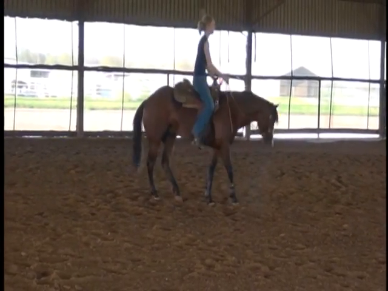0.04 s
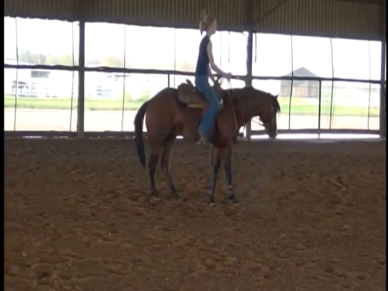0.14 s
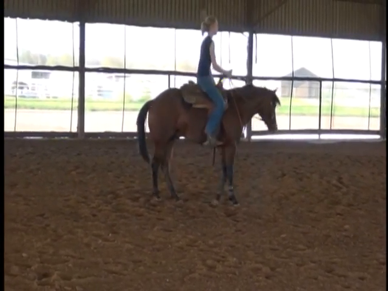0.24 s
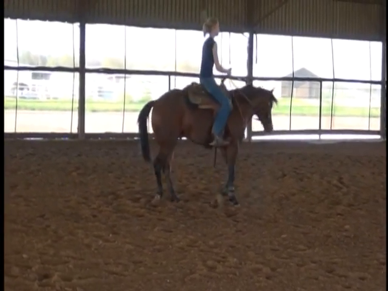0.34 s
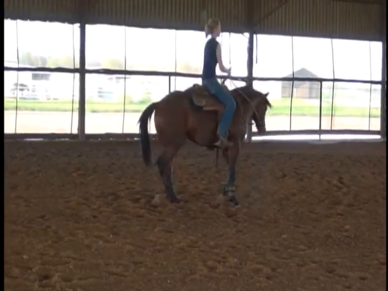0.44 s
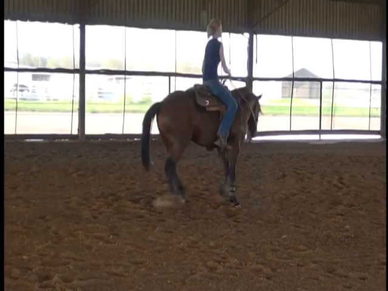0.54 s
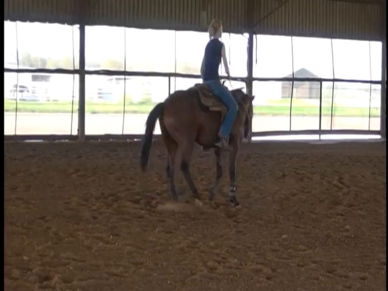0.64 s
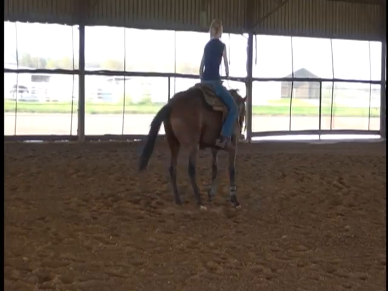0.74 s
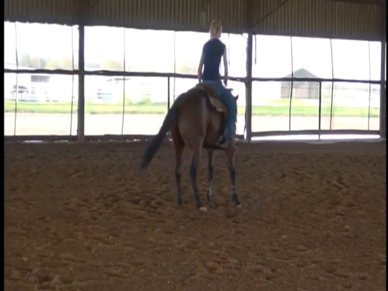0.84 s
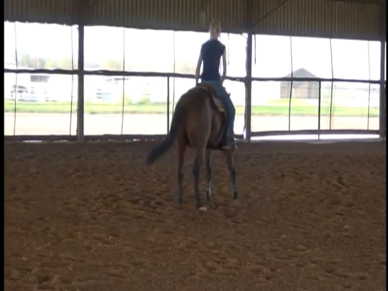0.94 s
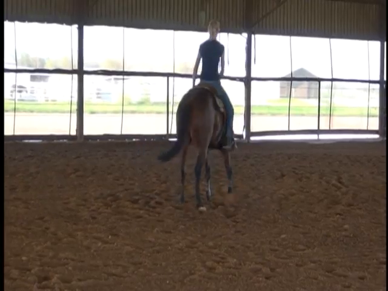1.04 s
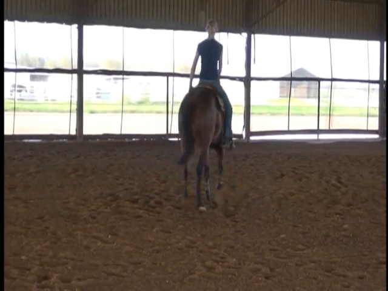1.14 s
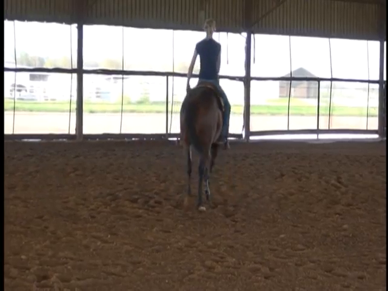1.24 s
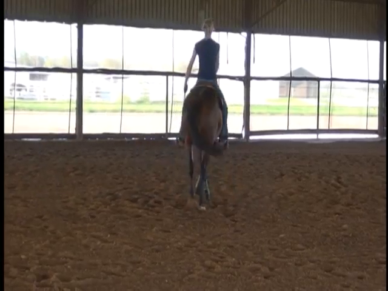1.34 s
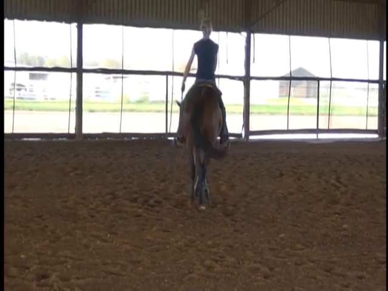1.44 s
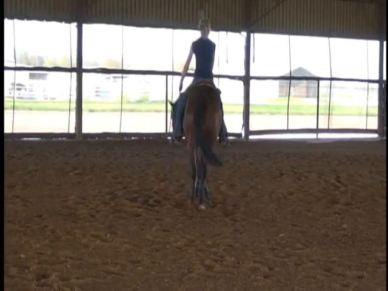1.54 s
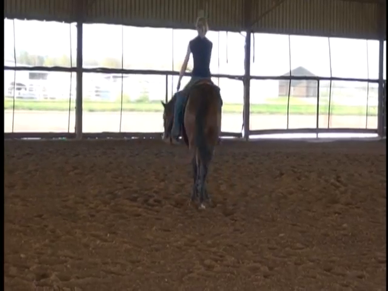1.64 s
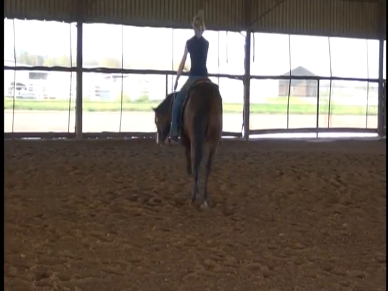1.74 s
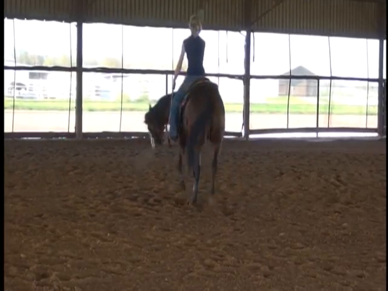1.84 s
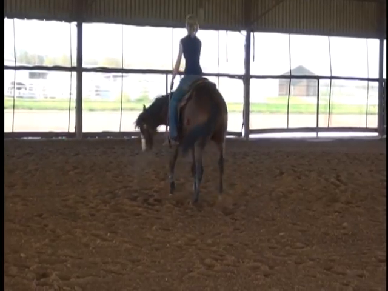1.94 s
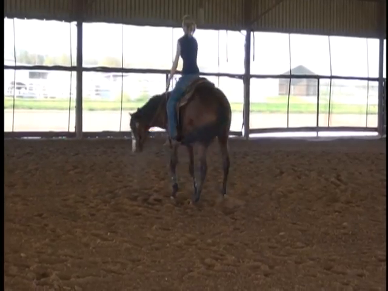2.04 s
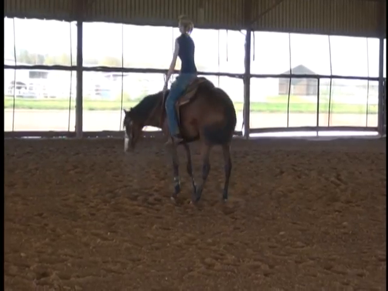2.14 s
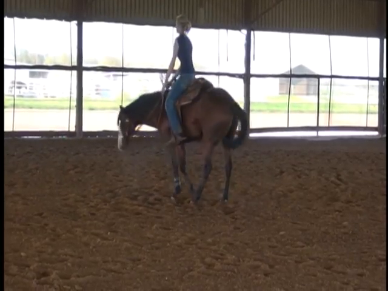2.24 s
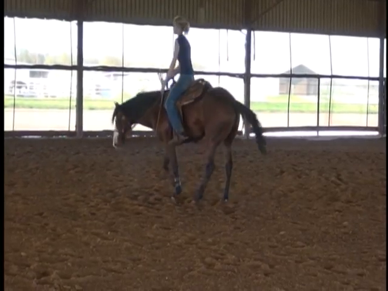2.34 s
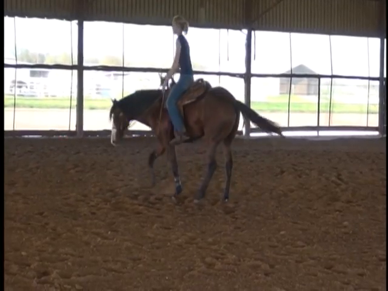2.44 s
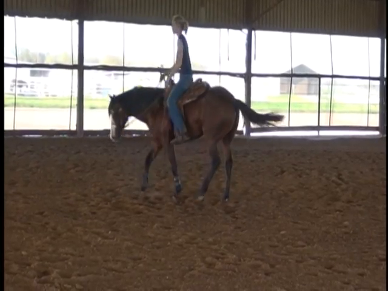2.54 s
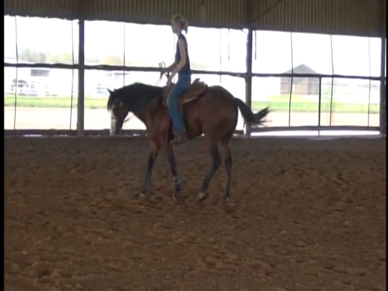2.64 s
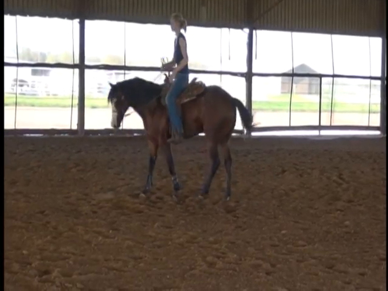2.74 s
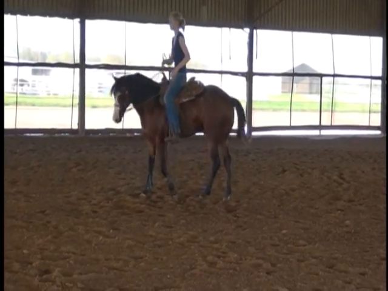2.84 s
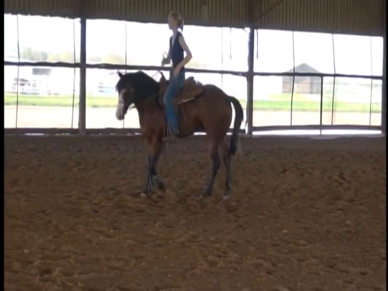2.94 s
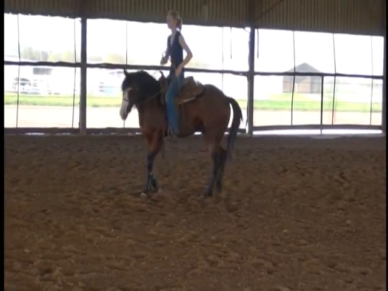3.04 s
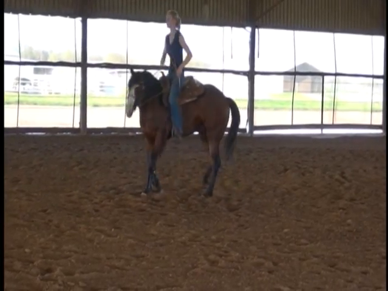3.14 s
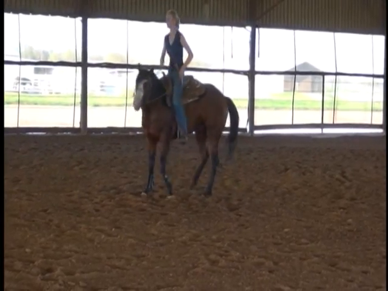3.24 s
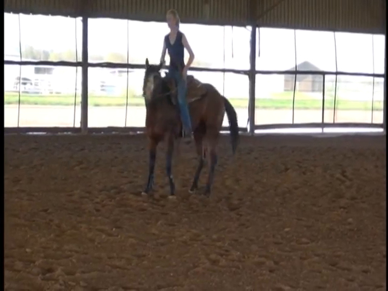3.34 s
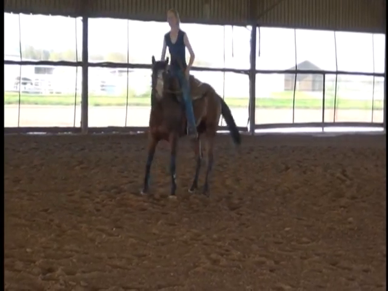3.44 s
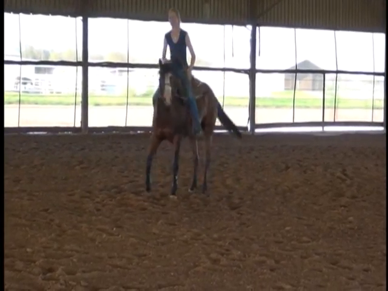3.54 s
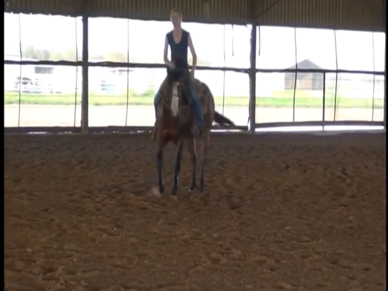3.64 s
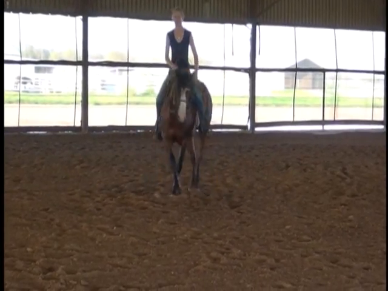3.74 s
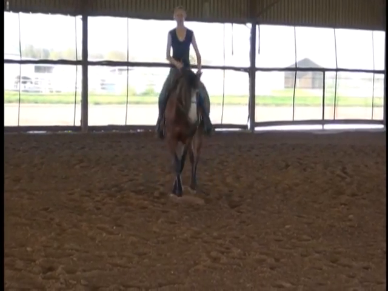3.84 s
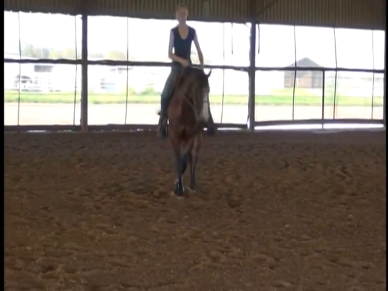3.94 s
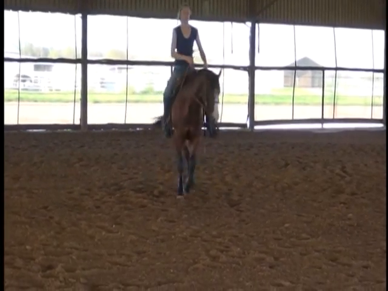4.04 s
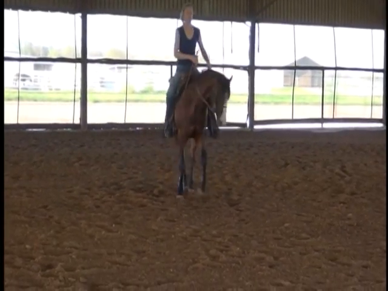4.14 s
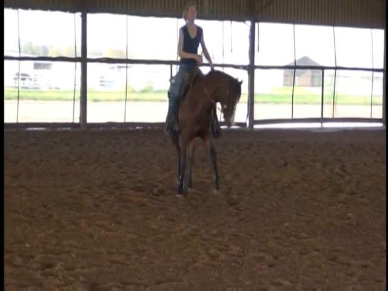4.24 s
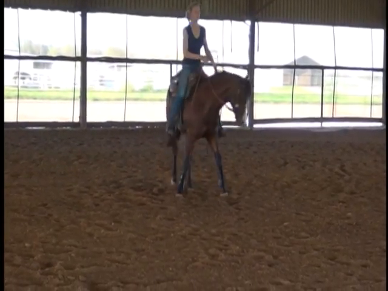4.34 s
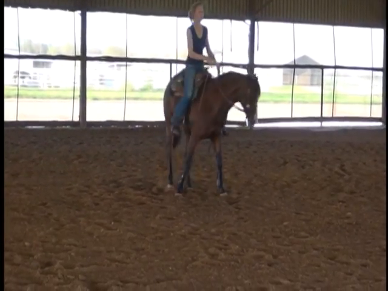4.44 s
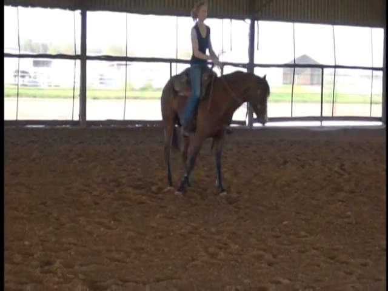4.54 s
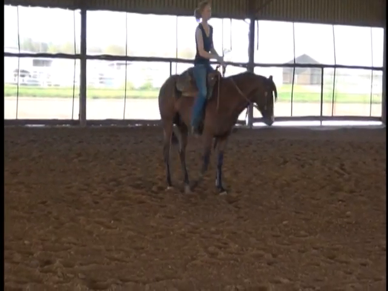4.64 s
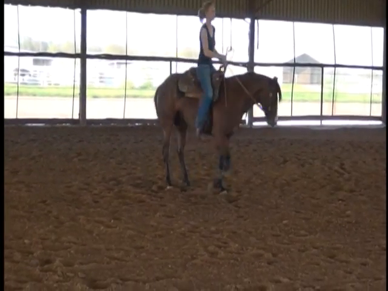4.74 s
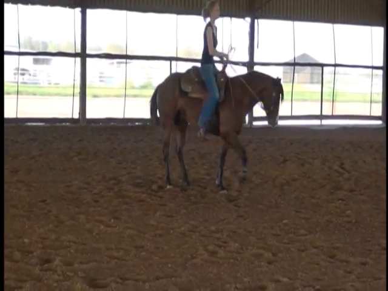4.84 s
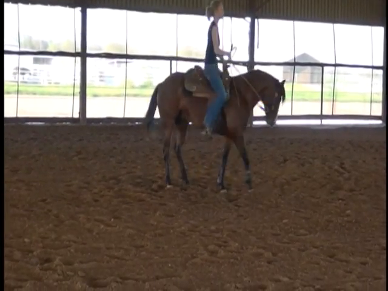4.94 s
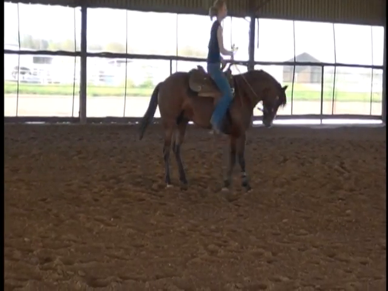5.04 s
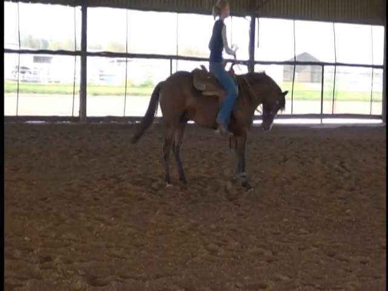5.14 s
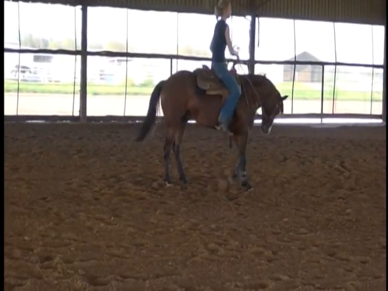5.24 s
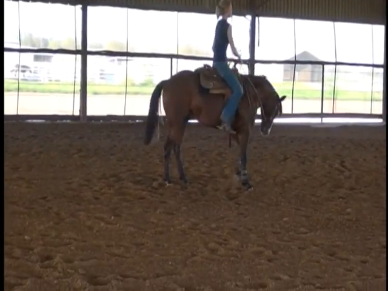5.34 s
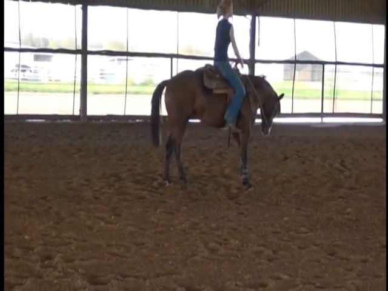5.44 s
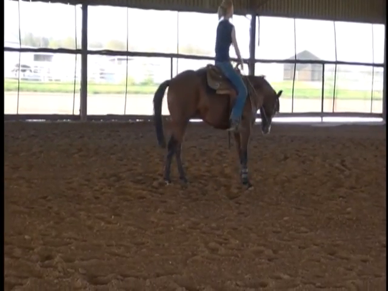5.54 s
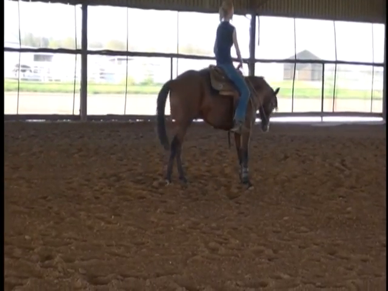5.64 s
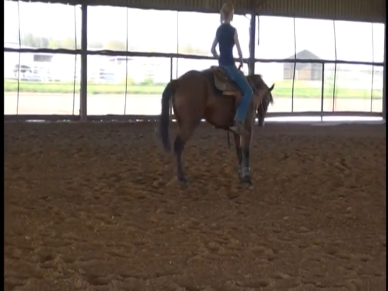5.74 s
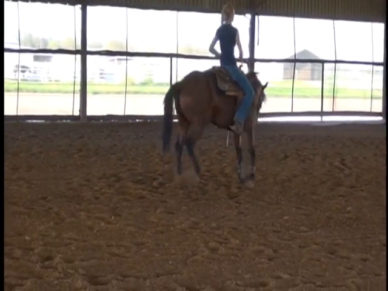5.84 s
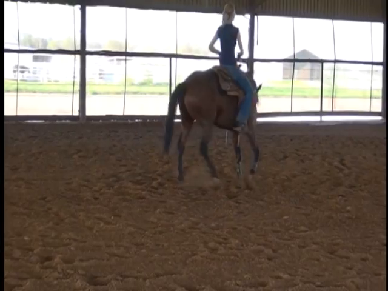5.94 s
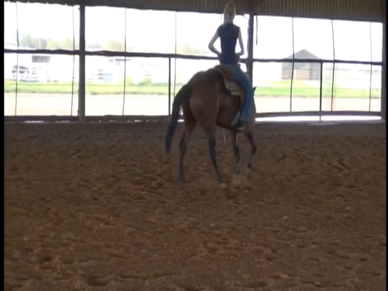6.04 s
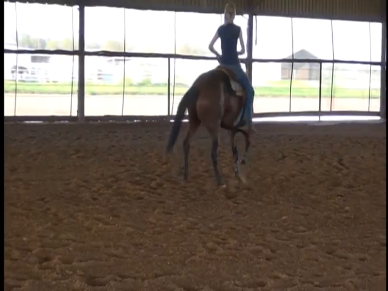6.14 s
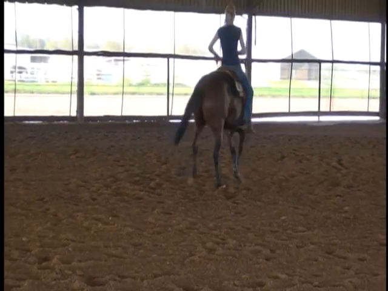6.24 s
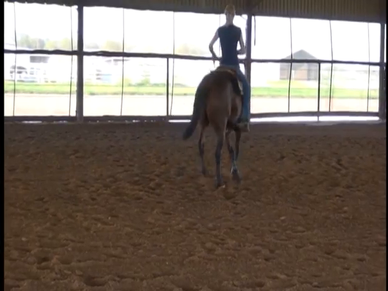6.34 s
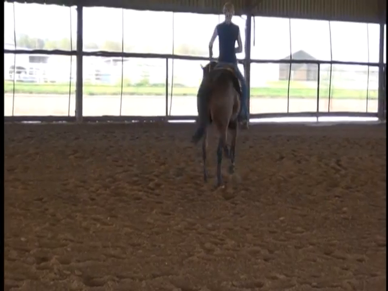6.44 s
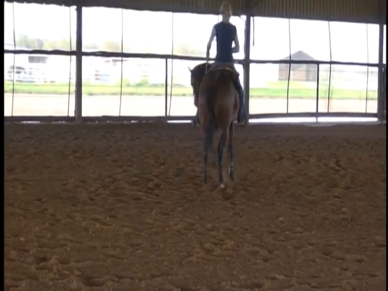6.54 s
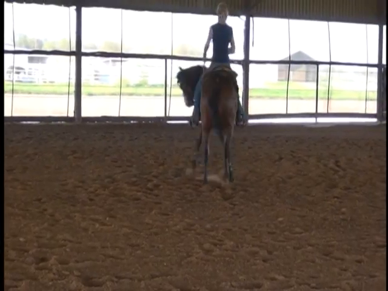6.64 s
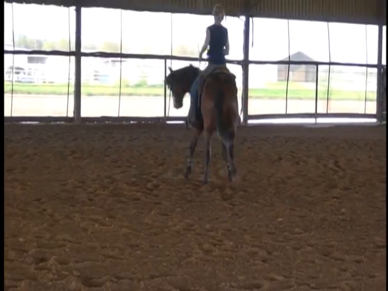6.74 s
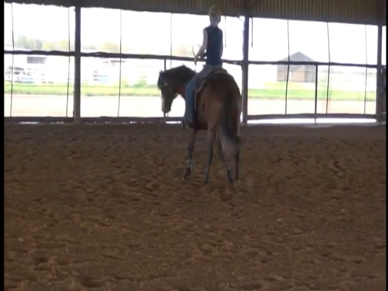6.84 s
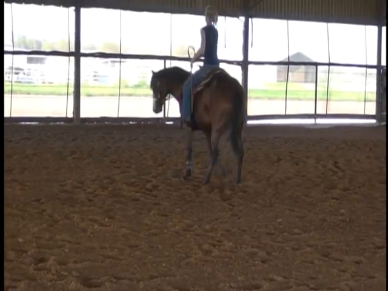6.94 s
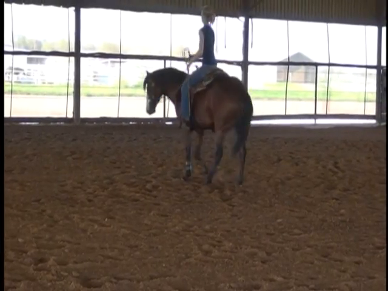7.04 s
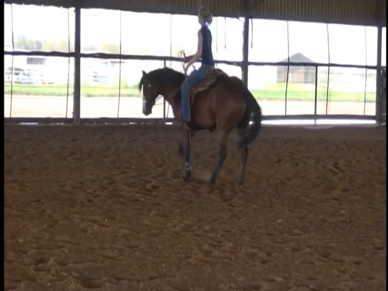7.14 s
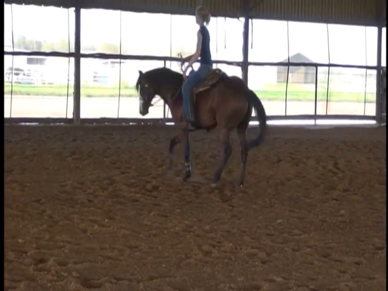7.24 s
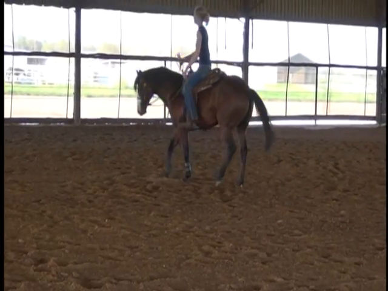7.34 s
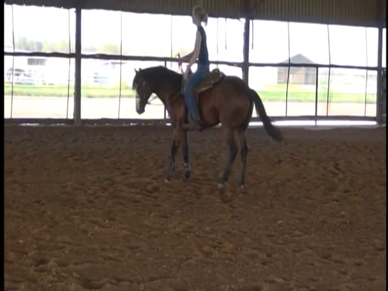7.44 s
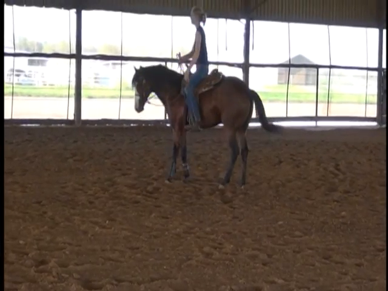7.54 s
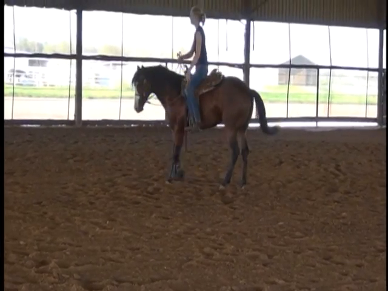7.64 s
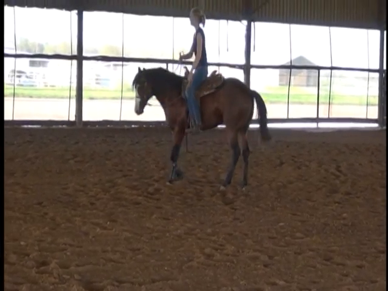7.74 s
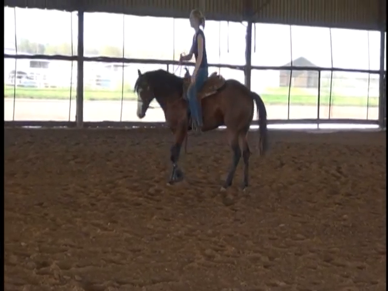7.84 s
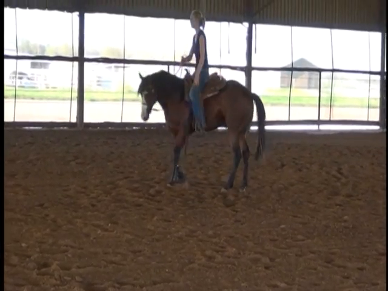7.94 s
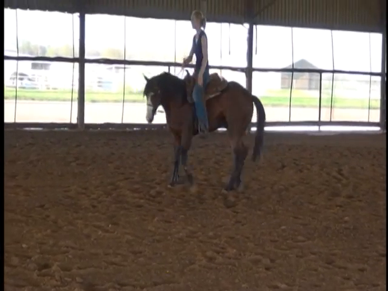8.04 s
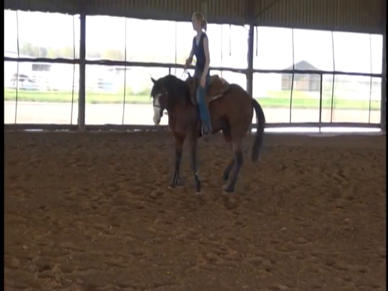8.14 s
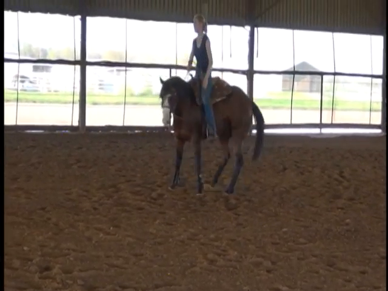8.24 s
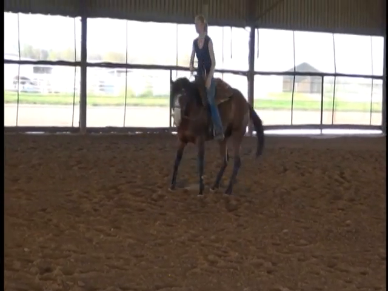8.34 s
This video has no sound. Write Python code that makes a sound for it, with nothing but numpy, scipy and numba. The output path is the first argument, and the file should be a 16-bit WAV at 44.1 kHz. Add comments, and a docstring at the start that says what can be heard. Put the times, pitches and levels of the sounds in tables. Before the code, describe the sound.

The faint tail of an earlier snort decays over the first second in a roofed, open-sided arena. Dull hoof thuds in soft dirt come near 0.2, 0.3 and 1.5 s, with small bright clicks of bit and spurs and bird chirps around 0.7 and 1.1 s. At about 1.75 s the horse snorts: a strong, damp, nasal burst, rapidly fluttering and slowing as the nostrils slacken, with wet pops and breathy hiss, ending near 2.4 s in a short hall echo. Then it is quiet: very soft, regular steps, a barely audible tail brush at 3.4 s, chirps near 2.7 and 3.5 s, a cluster of tack clinks around 4.1-4.4 s and a sharper click at 5.85 s. Gliding bird whistles crowd 5.1-6.7 s, with a low hooting pair near 6.2 s; chirps and light clinks continue to about 8.1 s. Distant traffic slowly recedes beneath steady hiss and faint hum.

```python
"""A horse snorts in a metal-roofed, open-sided arena: damp air rushes through the nose in puffs, chopped by
flapping nostrils, and excites resonances, slaps, wet pops and a jet of hiss. Around it hooves thud on soft
dirt as filtered noise, the tail brushes once, and steel bit and spurs click and ring as decaying modes.
Outside, small birds sing as gliding sines over a noise wash of distant traffic, with hiss and electrical hum.
The tail of an earlier blast dies away at the start; delays and decaying noise responses form the echoes."""
import sys
import numpy as np
from scipy import signal
from scipy.fft import rfft, irfft, next_fast_len
from scipy.io import wavfile
from scipy.ndimage import uniform_filter1d
from numba import njit

SR = 44100
rng = np.random.default_rng(int(sys.argv[2]) if len(sys.argv) > 2 else 0)


def materialize(psi):
    """Save the field psi as 16-bit PCM at rate SR to the path in sys.argv[1].

    A 1-D psi becomes a single channel; in a 2-D psi each row is a channel.
    """
    bounded = np.clip(np.atleast_2d(psi).T, -1, 1)
    quanta = np.round(bounded * 32767).astype(np.int16)
    wavfile.write(sys.argv[1], SR, quanta)


N = 369558
T = np.arange(N) / SR

# the snort is one push of air: its start, then the times to open, stay open and close (s)
SNORT_S, ATTACK_S, HOLD_S, RELEASE_S = 1.738, 0.08, 0.4, 0.17


def undb(db):
    """Level and amplitude: 20 dB is a factor of ten in gain."""
    return 10 ** (np.asarray(db) / 20)


def unit(x):
    """Normalization: scale the root-mean-square amplitude to 1."""
    return x / np.sqrt(np.mean(x ** 2))


def lookup(hz, points):
    """Logarithmic frequency scale: interpolate (Hz, value) points along it."""
    f, value = np.transpose(points)
    return np.interp(np.log(hz + 1), np.log(f), value)


def colour(x, points):
    """Linear filtering: weight the spectrum by a curve of (Hz, dB) points."""
    n = next_fast_len(len(x))
    gain = undb(lookup(np.fft.rfftfreq(n, 1 / SR), points))
    return irfft(rfft(x, n) * gain, n)[:len(x)]


def butter(x, order, hz, kind="low"):
    """Maximally flat filtering: pass a band without ripple."""
    return signal.sosfilt(signal.butter(order, hz, kind, fs=SR, output="sos"), x)


@njit
def band(x, hz, width):
    """Driven resonance: a second-order system whose centre may move; gain 1 at the centre."""
    y, b, l = np.empty(len(x)), 0., 0.
    for i in range(len(x)):
        g, k = np.pi * hz[i] / SR, width / hz[i]
        v = (b + g * (x[i] - l)) / (1 + g * (g + k))
        b, l, y[i] = 2 * v - b, l + 2 * g * v, k * v
    return y


def resonate(x, modes, sag=0., sag_above_hz=1750):
    """Modal superposition: sum (Hz, width Hz, dB) resonances; the upper ones sink by the share `sag`."""
    total = 0
    for k, (hz, width, db) in enumerate(modes):
        centre = hz * (np.ones(N) - sag * (hz > sag_above_hz))
        total = total + (-1) ** k * undb(db) * band(x, centre, 1. * width)
    return total


def ring(modes, t):
    """Free vibration: (Hz, dB, t60 s) modes decay exponentially, each slightly detuned at random."""
    total = 0
    for hz, db, t60 in modes:
        detuned_hz = hz * (1 + 0.00074 * rng.standard_normal())
        total = total + undb(db) * np.sin(2 * np.pi * detuned_hz * t) * np.exp(-np.log(1000) * t / t60)
    return total


def walk(rate):
    """Random modulation: low-passed noise with a spread near 1."""
    k = int(SR / rate)
    held = np.repeat(rng.standard_normal(N // k + 1), k)
    return 1.08 * uniform_filter1d(uniform_filter1d(held, k), k)[:N]


def swell(peak_s, width_s):
    """Gaussian envelope: a smooth rise and fall about a moment, 1 at the top."""
    return np.exp(-((T - peak_s) / width_s) ** 2)


def add(track, s, sound):
    """Superposition: mix a sound in at a time."""
    i = max(int(s * SR), 0)
    track[i:i + len(sound)] += sound[:N - i]


def spread(mid, side, side_db):
    """Spatial coherence: left and right share the middle; the side is weak at long wavelengths."""
    side_shape = [(120, -60), (250, -24), (500, -8), (1200, 0.5), (4000, 4.0), (9000, 5.0), (13000, 0.0)]
    return mid + undb(side_db) * colour(side, side_shape) * np.array([[1], [-1]])


def arena(x, wet_db, early_db, early_s=0.024, side_db=-15):
    """Reverberation: direct sound, quick scatter from ground and roof, and a tail whose treble dies first."""
    # Each row: frequency in Hz, reverberation time t60 in seconds.
    hall_t60 = [(150, 1.24), (1000, 0.91), (3000, 0.78), (6300, 0.76), (9000, 0.19), (14000, 0.14)]
    t = T[:int(1.5 * SR)]
    hz, s, cells = signal.stft(rng.standard_normal((2, len(t))), SR)
    decay = undb(-60 * s / lookup(hz, hall_t60)[:, None])
    tail = signal.istft(cells * decay, SR)[1][:, :len(t)]
    tail = tail * np.minimum(t / 0.057, 1)  # the tail builds up over 57 ms
    early = rng.standard_normal((2, len(t))) * np.exp(-t / early_s) * (t > .004)
    response = (undb(wet_db) * unit(tail) + undb(early_db) * unit(early)) / np.sqrt(len(t))
    mid, side = (signal.fftconvolve(x, r)[:N] for r in response)
    return spread(x + mid, side, side_db)


def traffic(start_db=-58.5, recede_db_per_s=0.31, restless_db=1.23):
    """Incoherent superposition: far traffic is a shaped noise that wavers in level and slowly recedes."""
    # Spectrum of the distant traffic. Each row: frequency in Hz, relative level in dB per Hz.
    outside = [(41, -42), (70, -8.5), (81, -3), (108, -1), (167, 0.5), (265, -9.5), (403, -9), (482, -2.5),
               (528, -6), (622, -3), (1020, -0.5), (1080, -1), (1150, -2), (1750, -6.5), (2500, -17.5),
               (3250, -23), (5500, -120)]
    level_db = start_db - recede_db_per_s * T
    far = []
    for _ in range(2):
        wash = unit(colour(rng.standard_normal(N), outside))
        far.append(wash * undb(level_db + restless_db * walk(3.87)))
    return spread(*far, -12.5)


def steady_hiss(level_db=-71):
    """Stationary broadband noise: a hiss with a fixed spectrum."""
    # Spectrum of the hiss. Each row: frequency in Hz, relative level in dB per Hz.
    hiss_shape = [(1500, 4), (2600, 4), (3700, 2.5), (5400, -3), (6300, -0.5), (7600, -7.5), (9800, -11.5),
                  (11700, -7.5), (14000, -10), (15800, 0.5)]
    mid, side = (unit(colour(rng.standard_normal(N), hiss_shape + [(16500, -40)])) for _ in range(2))
    return undb(level_db) * spread(mid, side, -11.5)


def electrical_hum():
    """Pure tones: mains hum, its second harmonic and a high whine are steady sines."""
    # Each row: frequency in Hz, level in dB rms.
    hum_tones = [(60, -78.5), (120, -83), (15734, -87)]
    return sum(undb(db) * np.sqrt(2) * np.sin(2 * np.pi * hz * T) for hz, db in hum_tones)


def dying_echo(start_db=-51, t60=0.93):
    """Exponential decay: the hall still rings from an earlier blast."""
    shape = [(80, -30), (230, 4.5), (400, 0.0), (1100, 2.0), (2200, -6.0), (4000, -16.0), (12000, -44)]
    mid, side = (unit(colour(rng.standard_normal(N), shape)) for _ in range(2))
    return spread(mid, side, -14.5) * undb(start_db) * np.exp(-np.log(1000) * T / t60)


def chirp_notes(trim_db=-.7, waver=0.01):
    """Frequency glide: a first note breaks at its crest and falls; a second climbs and drops."""
    # Two-note chirps of small birds. Each row: top of the first note in seconds, its top pitch in Hz,
    # relative levels of crest and fall in dB, delay of the second top in seconds, its relative level in dB.
    chirps = [(.695, 4480, -73, -71, .097, -71.5), (1.008, 4250, -79, -86, .05, -80),
              (1.148, 4300, -87, -78, .073, -80), (2.652, 4180, -73.5, -77, .11, -78),
              (3.378, 4200, -77, -75, .05, -79), (3.465, 4500, -68.5, -68.5, .095, -67),
              (3.978, 4250, -77, -78, .058, -78), (4.755, 3950, -78, -76, .04, -75),
              (5.662, 4300, -88, -73, .073, -79), (6.185, 4300, -87, -73.5, .07, -84),
              (6.695, 4250, -79, -71.5, .07, -75), (7.358, 4100, -78, -88, .054, -79),
              (7.568, 4050, -86, -71, .122, -76), (7.86, 4280, -76, -81, .045, -79),
              (8.105, 4000, -87, -80, .015, -82)]
    # Rise to the crest. Each row: seconds from the top, share of the top pitch, relative level in dB.
    first_note = [(-.04, .6, -16), (-.02, .76, -11), (-.009, .97, -1), (.009, 1, 0), (.014, .95, -8)]
    # Fall after the break. Each row: seconds from the first top, share of the break pitch, relative level in dB.
    fall = [(.012, 1, -2), (.024, .92, 0), (.036, .8, -1), (.049, .71, -8)]
    # Climb and drop. Each row: seconds from the second top, share of the top pitch, relative level in dB.
    second_note = [(-.03, .73, -7), (-.015, .85, -1), (0, 1, 1), (.01, .85, 0), (.028, .75, -8)]
    break_hz, second_hz = 3800, 3660
    notes = []  # (s, pitch Hz, gain, quaver)
    for s, first_hz, first_db, fall_db, delay, second_db in chirps:
        parts = [(first_note, s, first_hz, first_db),
                 (fall, s, break_hz, fall_db),
                 (second_note, s + delay, second_hz, second_db)]
        for shape, top_s, top_hz, db in parts:
            when, share, level = np.transpose(sorted(shape))
            t = np.arange(when[0], when[-1], 1 / SR)
            pitch = top_hz * np.interp(t, when, share)
            gain = undb(db + trim_db + np.interp(t, when, level))
            notes.append((top_s + when[0], pitch, gain, waver))
    return notes


def whistle_notes(trim_db=-2.4):
    """Exponential relaxation: each whistle's pitch glides toward a final one."""
    # Bird whistles. Each row: start in seconds, length in seconds, start pitch in Hz, final pitch in Hz,
    # settling time in seconds, relative level in dB, quaver as a share of the pitch.
    whistles = [(3.379, .125, 5340, 5420, 0.1, -80.5, .004), (5.138, 0.063, 3550, 3130, 0.039, -75, .008),
                (5.305, 0.13, 3200, 2580, 0.076, -72, 0.0091),
                (5.463, 0.18, 2720, 2640, 0.081, -78, 0.0066), (5.453, 0.09, 3380, 2900, 0.037, -75, .015),
                (5.763, 0.064, 3350, 2930, 0.074, -76, .008), (5.768, 0.075, 3670, 3620, .05, -76.5, .008),
                (5.795, 0.32, 4800, 3940, 0.17, -81.5, 0.011),
                (6.021, 0.1, 3720, 2640, 0.045, -70.5, 0.027),
                (6.227, 0.13, 4760, 4450, 0.038, -77.5, .005), (6.355, .11, 4260, 3900, 0.047, -76, .014),
                (6.526, .12, 4030, 3780, 0.061, -79, 0.044), (6.494, 0.12, 3205, 2950, 0.12, -74, .008),
                (6.647, 0.11, 3170, 2970, 0.11, -76, .015), (6.152, 0.048, 1333, 1280, .045, -65, .006),
                (6.187, 0.074, 1071, 1037, 0.055, -56.5, 0.0055)]
    notes = []
    for s, length, start_hz, final_hz, settle_s, db, hoarse in whistles:
        glide = np.exp(-T[:int(length * SR)] / settle_s)
        notes.append((s, final_hz + (start_hz - final_hz) * glide, undb(db + trim_db), hoarse))
    return notes


def birds(flicker_db=2.8, fade_s=.005, echo_s=.064, echo_db=-14):
    """Frequency modulation: chirps and whistles quaver as sines, and the roof returns each once."""
    out, quaver = np.zeros(N), walk(400)
    for s, hz, gain, depth in chirp_notes() + whistle_notes():
        t = T[:len(hz)]
        fade = np.minimum(np.minimum(t, t[::-1]) / fade_s, 1)
        quavering_hz = hz * (1 + depth * quaver[int(s * SR):][:len(hz)])
        note = gain * fade * np.sin(2 * np.pi * np.cumsum(quavering_hz) / SR)
        add(out, s, note)
        add(out, s + echo_s, undb(echo_db) * note)
    return out * undb(flicker_db * walk(60))


def tail_swish(db=-77):
    """Friction noise: the tail flicks once, a soft brush of hair."""
    hair_shape = [(2000, -18), (4000, -5), (6000, -2), (8000, -11), (14000, -20)]
    hair = unit(colour(rng.standard_normal(N), hair_shape))
    return undb(db) * hair * swell(peak_s=3.37, width_s=0.16)


def hooves(trim_db=-7):
    """Damped impact: each hoof sinks into loose dirt, a dull thud with a little scuff."""
    # The firmest footfalls. Each row: start in seconds, relative level in dB.
    firm_steps = [(.189, -55), (.31, -53), (.7, -63), (1.507, -51), (4.122, -58)]
    step_s, scatter_s, step_db = 0.54, 0.073, -67  # the regular walk; its level is relative too
    dirt = [(50, -42), (120, -7), (200, -9.0), (350, -38.0), (1000, -9), (3000, -21), (9000, -79)]
    out, t = np.zeros(N), T[:SR // 3]
    sink = np.minimum(t / .006, 1) * np.exp(-t / .025)
    beats = np.arange(step_s, T[-1] - step_s, step_s)
    steps = [(s + scatter_s * rng.uniform(-1, 1), step_db) for s in beats]
    for s, db in list(firm_steps) + steps:
        thud = unit(colour(rng.standard_normal(len(t)), dirt)) * sink
        add(out, s, undb(db + trim_db) * thud)
    return out


def tack(click_s=0.0021, click_trim_db=2, small_trim_db=1.5, large_trim_db=2, dull_db=-11, bright_oct=0.74):
    """Impact excitation: steel bit and spurs knock, a short click that bounces back over ringing modes."""
    # Knocks. Each row: start in seconds, relative click level in dB, brightest frequency in Hz, relative ring
    # of the small steel piece in dB, its pitch in Hz, relative ring of the larger piece in dB.
    knocks = [(0.115, -57.5, 9000, -72, 11600, -72), (0.128, -60, 9000, -63, 11600, -75),
              (.226, -65, 8500, -90, 11580, -76), (.343, -63.5, 11000, -90, 11580, -90),
              (0.599, -51.5, 6500, -73, 11500, -93), (0.684, -63, 9000, -88, 11580, -89),
              (.782, -76, 8500, -80, 11580, -76), (0.839, -60, 9000, -74, 11580, -69),
              (.915, -61, 9000, -85, 11580, -78), (0.929, -63, 9000, -77, 11580, -72),
              (1.023, -64, 9000, -60, 11530, -74), (1.167, -75, 8500, -69, 11560, -69),
              (1.416, -58.5, 9000, -80, 11580, -74), (1.557, -72, 9000, -66, 11700, -70),
              (1.686, -54.5, 6470, -82, 11580, -77), (1.762, -56, 12000, -59, 11580, -71),
              (2.386, -76, 8500, -76, 11600, -74), (2.508, -72, 8500, -74, 11560, -74),
              (2.786, -53, 12600, -81, 11500, -84), (3.263, -63, 11000, -81, 11600, -82),
              (3.321, -62, 7500, -90, 11580, -79), (3.428, -74, 10000, -66, 11430, -84),
              (3.585, -66, 9000, -80, 11600, -85), (4.118, -59, 7000, -86, 11580, -90),
              (4.1214, -50.5, 8250, -86, 11580, -90), (4.181, -49, 9400, -70, 11800, -61),
              (4.272, -54.5, 10500, -58, 11600, -76), (4.287, -68, 11000, -54, 11500, -85),
              (4.393, -58.5, 10500, -59, 11500, -77), (4.652, -72, 7000, -84, 11580, -73),
              (4.805, -61, 7500, -90, 11580, -75), (4.959, -68, 8000, -90, 11580, -78),
              (5.029, -63, 11500, -58, 11200, -90), (5.157, -66, 9500, -80, 11450, -90),
              (5.262, -56.5, 6600, -66, 11700, -75), (5.468, -56.5, 9000, -58, 11620, -78),
              (5.8486, -41, 9900, -76, 11580, -90), (6.436, -55, 8500, -70, 11560, -62),
              (6.521, -54.5, 12500, -57, 11500, -78), (6.644, -72, 7000, -85, 11600, -76),
              (6.953, -54, 11000, -69, 11500, -74), (7.187, -64, 4500, -76, 11560, -92),
              (7.412, -67, 8000, -76, 11580, -83), (7.55, -58, 8000, -90, 11580, -78),
              (7.563, -63, 9000, -82, 11400, -85), (7.665, -67, 10000, -90, 11580, -85),
              (8.084, -62, 10500, -70, 11500, -81)]
    # Colour of a click. Each row: frequency in Hz, relative level in dB.
    click_colour = [(1500, -37), (3800, -2), (5000, 0), (6200, 3), (7400, -9), (8600, -3.5), (10100, -8),
                    (11500, -3), (12700, -5.5), (13800, -15), (16000, -20)]
    # Reflections off ground and horse. Each row: delay in seconds, level in dB relative to the click.
    bounces = [(.0066, -11), (.0098, -14)]
    # Modes of the small steel piece. Each row: multiple of its pitch, relative level in dB, t60 in seconds.
    small_steel = [(1, -3.5, 0.22), (1.101, -16, .08)]
    # Modes of the larger steel piece. Each row: frequency in Hz, relative level in dB, t60 in seconds.
    large_steel = [(6170, -2.5, 0.062), (9110, -2, 0.044), (9080, 6.5, 0.058)]
    out, t = np.zeros(N), T[:SR // 3]
    for s, db, bright_hz, small_db, small_hz, large_db in knocks:
        shape = []
        for hz, level in click_colour:
            off_oct = np.log2(hz / bright_hz)
            shape.append((hz, level + dull_db * (1 - np.exp(-(off_oct / bright_oct) ** 2))))
        click = unit(colour(rng.standard_normal(len(t)), shape)) * np.exp(-t / click_s)
        click = undb(db + click_trim_db) * click
        small_modes = [(small_hz * k, level, t60) for k, level, t60 in small_steel]
        small_ring = undb(small_db + small_trim_db) * ring(small_modes, t)
        large_ring = undb(large_db + large_trim_db) * ring(large_steel, t)
        add(out, s, click + small_ring + large_ring)
        for delay, loss_db in bounces:
            add(out, s + delay, undb(loss_db) * click)
    return out


def splutter(trim_db=-1.5, small_db=-32, scatter_db=3, gap_s=1 / 70, cycles=0.89, small_hz=1450):
    """Heavily damped oscillation: wet pops in the nostrils, a few loud ones among many small ones."""
    # The loudest wet pops. Each row: centre in seconds, relative level in dB, pitch in Hz.
    loud_pops = [(1.92, -20, 1410), (1.9595, -25, 1790), (1.9865, -24, 1690), (2.052, -25, 760),
                 (2.065, -19, 1150), (2.217, -28, 1520)]
    out, t = np.zeros(N), T[:SR // 100] - .003
    chance = rng.standard_normal((200, 3))
    times = SNORT_S + ATTACK_S + np.cumsum(np.abs(chance[:, 0])) * gap_s
    small_pops = []
    for s, (_, a, b) in zip(times, chance):
        if s < SNORT_S + ATTACK_S + HOLD_S:
            small_pops.append((s, small_db + scatter_db * min(a, 1), small_hz * 2 ** (.5 * b)))
    for s, db, hz in list(loud_pops) + small_pops:
        envelope = np.exp(-np.abs(t) * hz / cycles)  # falls to 1/e in `cycles` periods
        pop = envelope * np.cos(2 * np.pi * (hz * t + rng.random()))
        add(out, s + t[0], undb(db + trim_db) * pop)
    return butter(out, 6, 3000)


def droplets(per_s=260, size_db=4):
    """Random impulses: moisture torn loose in the nose clicks at chance moments, a few clicks large."""
    chance, size = rng.random(N), rng.exponential(size=N)
    clicks = (chance < per_s / SR) * undb(size_db * np.minimum(size, 3))
    return unit(clicks * rng.choice([-1, 1], N))


def spray(per_s=520, burst_s=.0005):
    """Shot noise: droplets burst at the nostril rims as tiny decaying puffs of hiss."""
    bursts = signal.lfilter([1], [1, -np.exp(-1 / (burst_s * SR))], np.abs(droplets(per_s, size_db=2.5)))
    return unit(bursts * rng.standard_normal(N))


def blend(taut, slackened, slack):
    """Linear interpolation: pass from the taut value to the slack one."""
    return taut + (slackened - taut) * slack


def airflow(puff, chop, slack, spray_db=-3, hiss_chop=0.53, treble_chop=1.1, treble_delay_s=0.091,
            top_delay_s=0.12, taut_treble_db=-1, slack_treble_db=1.0, top_fall_s=2.25):
    """Jet turbulence: hiss at the rims brightens as it gathers speed; its treble is chopped most deeply."""
    # Spectrum of the air jet. Each row: frequency in Hz, relative level in dB.
    jet_shape = [(300, -45), (2000, -1), (3200, 4), (4200, 3), (5100, 3.5), (6100, -4.5), (7600, -1),
                 (8700, 3.5), (9700, -5.5), (11600, -1.5), (13500, -14), (15500, -17)]

    def rise(delay_s):
        return .5 + .5 * np.tanh(2 * (T - SNORT_S - delay_s) / delay_s)

    def chopped(depth):
        return 1 + depth * chop * (puff - 1)

    jet = unit(colour(rng.standard_normal(N) + undb(spray_db) * spray(), jet_shape))
    above_6k = colour(jet, [(4500, -30), (7000, 0)])
    top = colour(jet, [(9000, -30), (12500, 0)])
    top_fall = .5 - .5 * np.tanh((T - top_fall_s) / .09)
    treble = (above_6k - top) * rise(treble_delay_s) + top * rise(top_delay_s) * top_fall
    treble = treble * undb(blend(taut_treble_db, slack_treble_db, slack))
    return (jet - above_6k) * chopped(hiss_chop) + treble * chopped(treble_chop)


def nasal_passages(air, slaps, chop, slack, slap_db=-7, broad_db=-3, crack_db=-1, crack_hz=2700,
                   rim_hz=2850, taut_ring_db=1.0, slack_ring_db=-3.0):
    """Source and filter: chopped air and slaps excite the resonances of the nose."""
    # Resonances of the nasal passages. Each row: frequency in Hz, width in Hz, relative level in dB.
    nose_modes = [(747, 17, 3), (833, 26, 8), (1000, 60, 0.5), (1073, 30, 4.5), (1179, 51, 6),
                  (1384, 90, -1), (1465, 96, 0), (1610, 95, 4), (1840, 55, -9), (1980, 38, -10),
                  (2280, 130, -5), (2440, 45, -12), (2640, 130, -16)]
    mode_sag = 0.033  # share by which the upper resonances sink as the nostrils slacken
    throat = butter(air + undb(slap_db) * chop * slaps, 2, [620, 2600], "band")
    resonant = resonate(throat, nose_modes, sag=mode_sag * (slack - .5))
    nose = unit(unit(resonant) + undb(broad_db) * unit(throat))
    crack = butter(slaps, 3, [750, crack_hz], "band")  # the slap also sounds straight from the rims
    nose = unit(butter(nose + undb(crack_db) * crack, 6, rim_hz))  # soft flesh holds back the treble
    upper = colour(nose, [(1200, -30), (1500, 0)])
    lower = nose - upper
    # the upper resonances speak first and are damped as the walls slacken; the lower ones peak later
    upper = upper * swell(peak_s=1.975, width_s=0.32) * undb(blend(taut_ring_db, slack_ring_db, slack))
    return lower * swell(peak_s=2.013, width_s=0.29) + upper


def head_resonance(air):
    """Forced resonance: low-pitched air noise excites the head and soft nostril walls."""
    # Resonances of head and nostril walls. Each row: frequency in Hz, width in Hz, relative level in dB.
    head_modes = [(142, 32, -10.5), (247, 13, 0.5), (346, 65, -5.5), (483, 290, -9.5), (616, 39, 0.5)]
    head = unit(resonate(butter(air, 4, [120, 700], "band"), head_modes))
    return head * swell(peak_s=2.29, width_s=0.54)


def flap_purr(hz, phase):
    """Harmonic series: overtones 3 to 12 of the flapping purr, each wavering in level and phase."""
    # How the head lets the overtones through. Each row: frequency in Hz, relative level in dB.
    purr_shape = [(90, -16), (125, -8), (160, -4), (200, -14.5), (250, 2), (290, -9), (340, -9),
                  (400, -11.5), (480, -2)]
    purr = 0
    for k in range(3, 13):
        gain = undb(lookup(k * hz, purr_shape) + 3.1 * walk(29.95))
        purr = purr + gain * np.cos(2 * np.pi * k * phase + .5 * walk(16))
    return unit(purr) * swell(peak_s=2.008, width_s=0.21)


def snort(open_share=0.13, scatter_db=1.15, stumble=.02, moist_db=-1, flutter_db=3.0, ragged_db=2.0,
          nose_db=-37.0, head_db=-51.5, purr_db=-50.0, jet_db=-49.0):
    """Flow-driven flapping: nostrils chop damp air into puffs, with a slap at the peak of each puff."""
    first_flap_s = 1.812
    slack_s, slacken_s = 2.05, 0.03986  # when the nostrils go slack, and how gradually
    # slack nostrils flap more slowly and close more fully
    slack = .5 + .5 * np.tanh((T - slack_s) / (2 * slacken_s))
    hz = blend(40.7, 32.27, slack)  # flaps per second
    chop = blend(0.39, 0.67, slack)  # share of the air that they chop
    phase = np.cumsum(hz) / SR
    phase = phase - np.interp(first_flap_s, T, phase) + stumble * walk(30)
    cycle = np.round(phase - np.floor(phase[0])).astype(int)
    size = undb(scatter_db * rng.standard_normal(size=1000))[cycle]  # each flap has its own force
    flutter = undb(flutter_db * walk(450))  # the wet rims tremble within each flap
    from_flap = np.abs((phase + .5) % 1 - .5)  # distance to the nearest flap, in cycles
    puff = unit(size * flutter * np.exp(-from_flap / open_share))
    strikes = np.diff(np.floor(phase), prepend=np.floor(phase[0]))
    slaps = unit(strikes * size * (phase > -.5))  # no slap before the first flap
    slaps = slaps * swell(peak_s=2.02, width_s=0.28)  # hardest at the height of the push
    damp_air = rng.standard_normal((2, N)) + undb(moist_db) * droplets()
    air = damp_air * (1 - chop + chop * puff) * undb(ragged_db * walk(130))
    nose = undb(nose_db) * nasal_passages(air[0], slaps, chop, slack)
    head = undb(head_db) * head_resonance(air[1])
    purr = undb(purr_db) * flap_purr(hz, phase)
    jet = undb(jet_db) * airflow(puff, chop, slack) * swell(peak_s=1.946, width_s=0.47)
    corners = SNORT_S + np.cumsum([0, ATTACK_S, HOLD_S, RELEASE_S])
    gate = np.interp(T, corners, [0, 1, 1, 0]) ** 2
    return gate * (nose + head + purr + jet)


def scene():
    """Room acoustics: horse, tack and birds sound through the arena; the birds have the most echo."""
    background = traffic() + steady_hiss() + electrical_hum()
    song = undb(4.5) * arena(birds(), wet_db=-10, early_db=-5.5)
    metal = arena(tack(), wet_db=-15.5, early_db=-12.5)
    horse = arena(snort() + splutter() + hooves() + tail_swish(), wet_db=-11.5, early_db=-8.0)
    return background + dying_echo() + song + metal + horse


def record(dry):
    """Band limitation: the top is cut steeply at 15950 Hz; the left channel is slightly stronger."""
    balance = undb(np.array([[.15], [-.15]]))
    steep_cut = signal.ellip(10, .2, 70, 15950, fs=SR, output="sos")
    return signal.sosfilt(steep_cut, dry * balance)


dry = scene()
out = record(dry)
materialize(out)
```